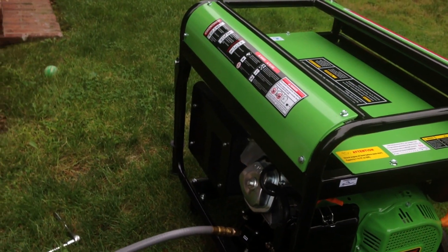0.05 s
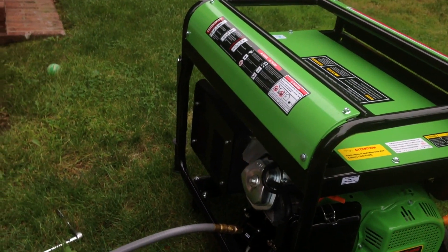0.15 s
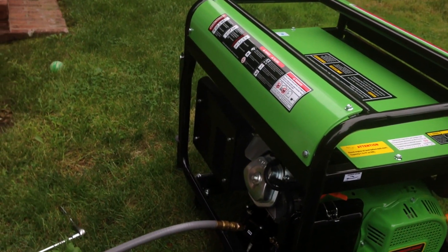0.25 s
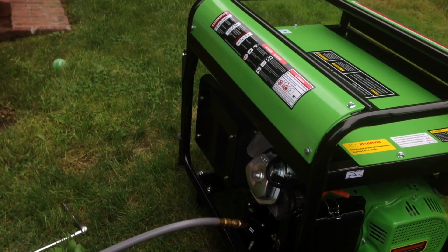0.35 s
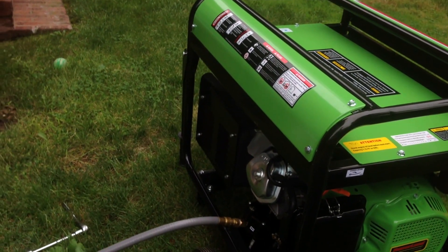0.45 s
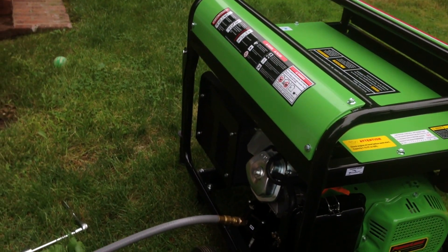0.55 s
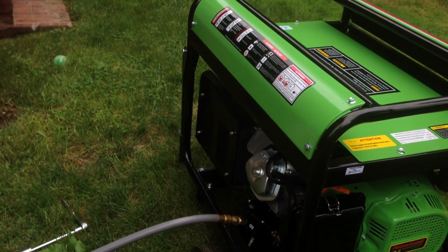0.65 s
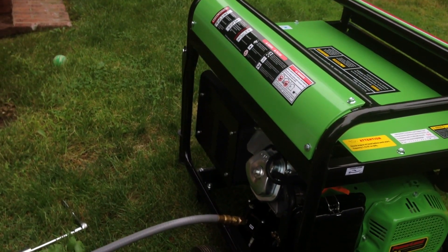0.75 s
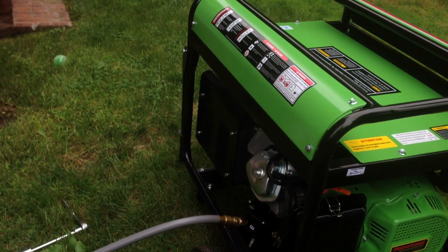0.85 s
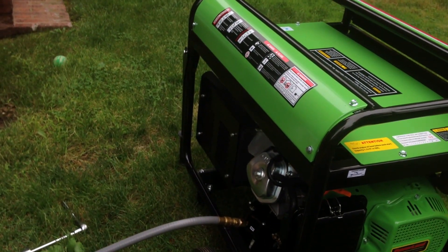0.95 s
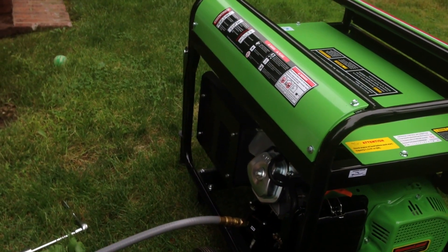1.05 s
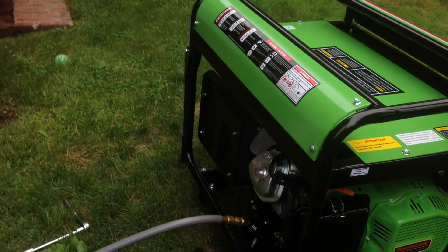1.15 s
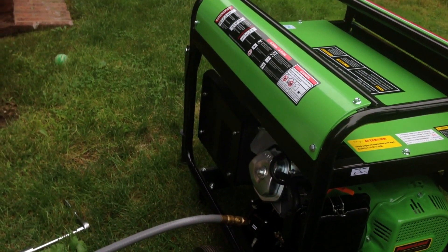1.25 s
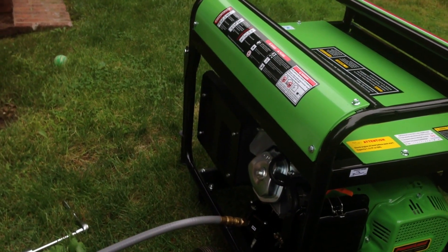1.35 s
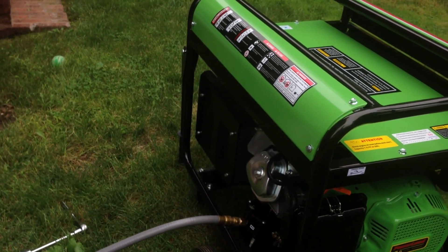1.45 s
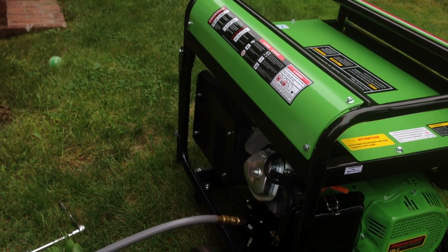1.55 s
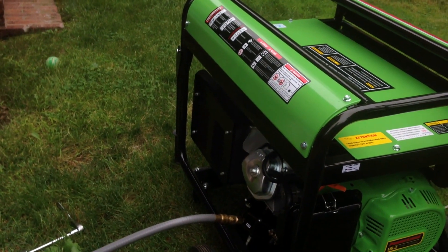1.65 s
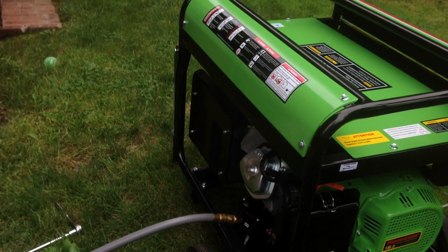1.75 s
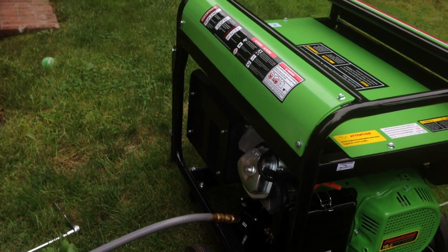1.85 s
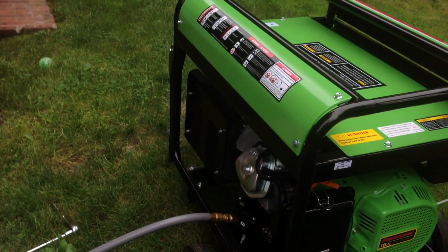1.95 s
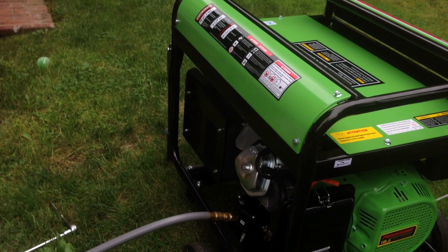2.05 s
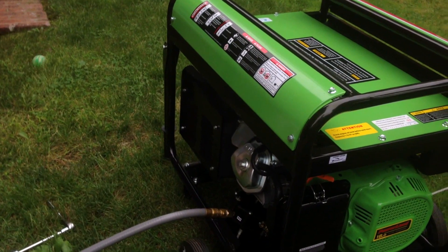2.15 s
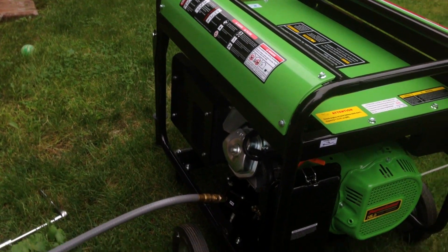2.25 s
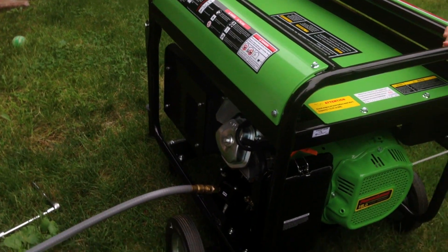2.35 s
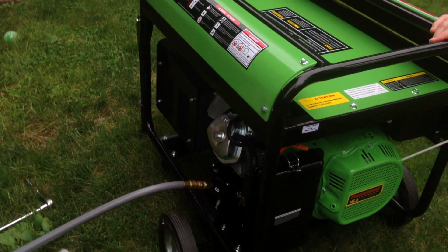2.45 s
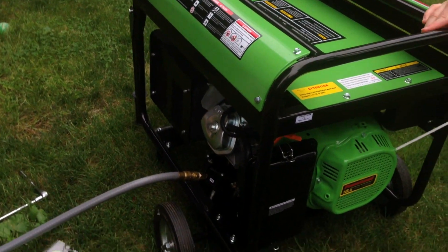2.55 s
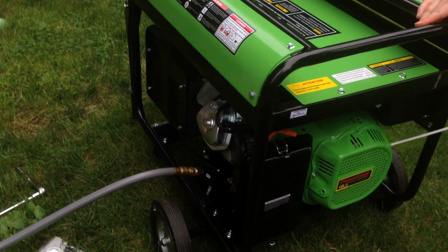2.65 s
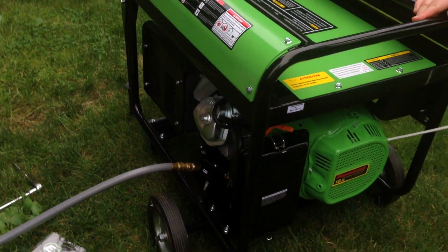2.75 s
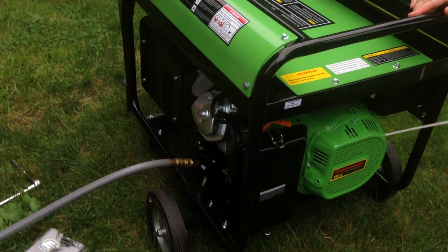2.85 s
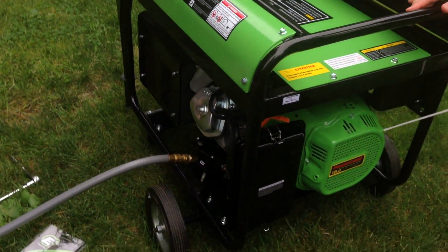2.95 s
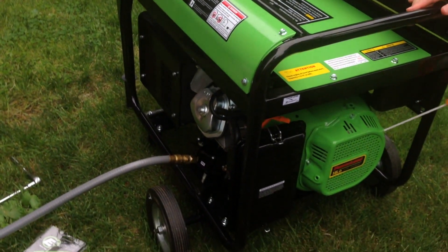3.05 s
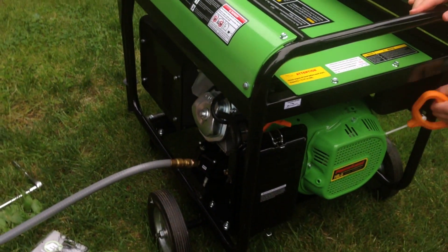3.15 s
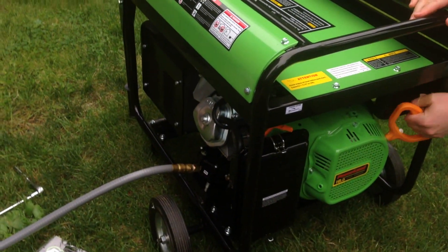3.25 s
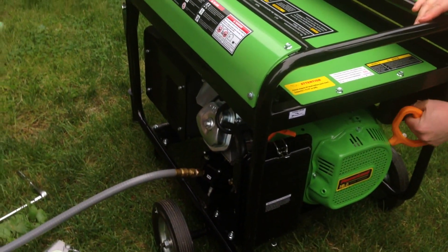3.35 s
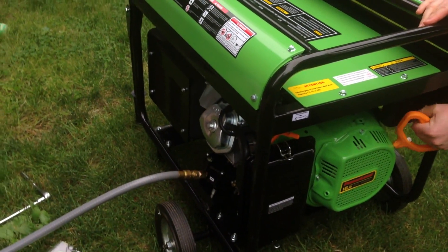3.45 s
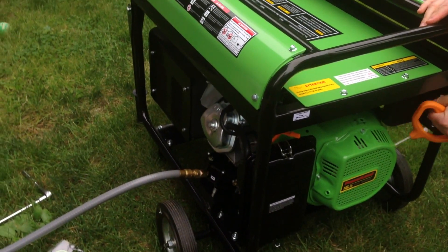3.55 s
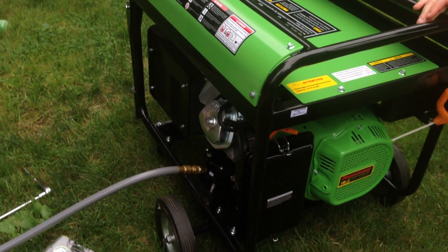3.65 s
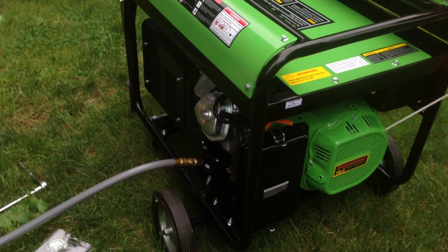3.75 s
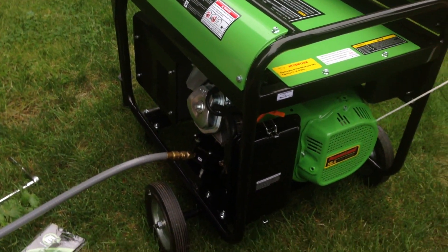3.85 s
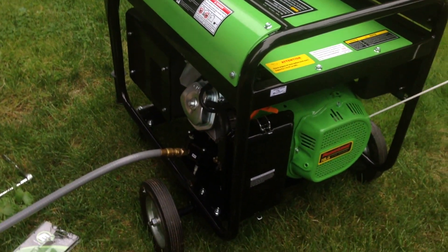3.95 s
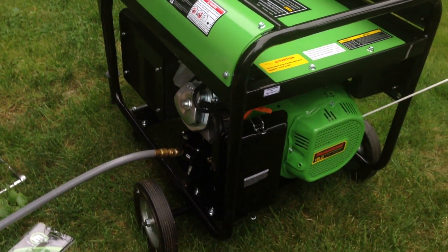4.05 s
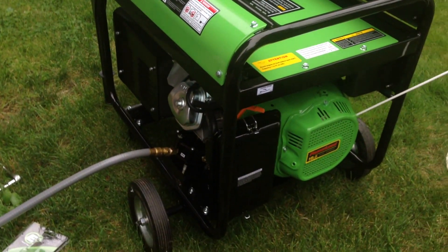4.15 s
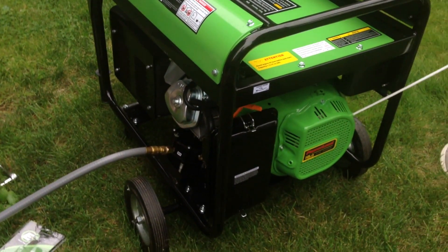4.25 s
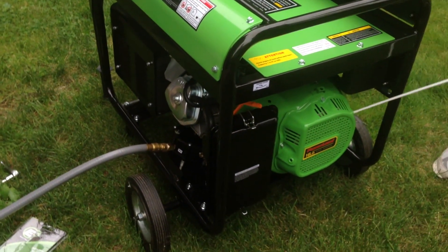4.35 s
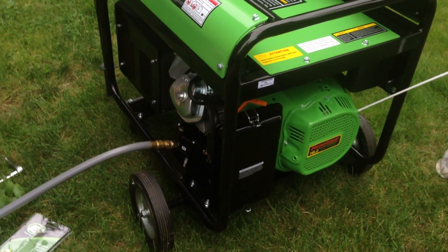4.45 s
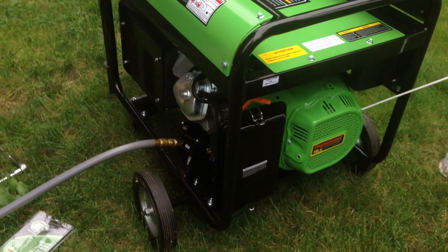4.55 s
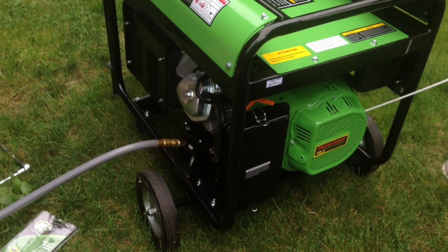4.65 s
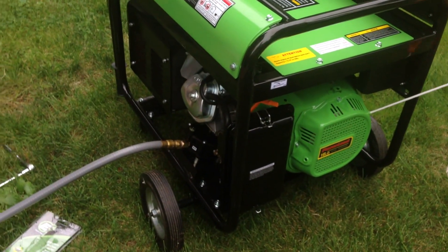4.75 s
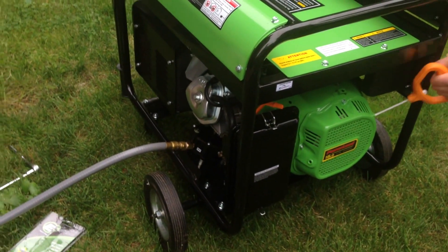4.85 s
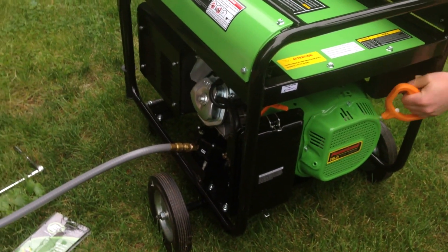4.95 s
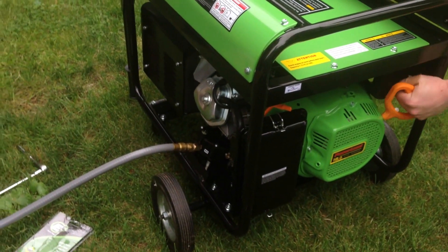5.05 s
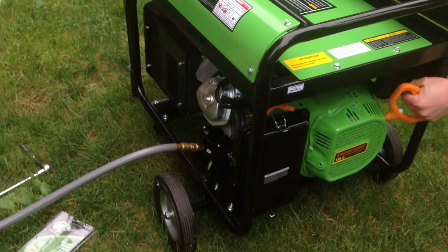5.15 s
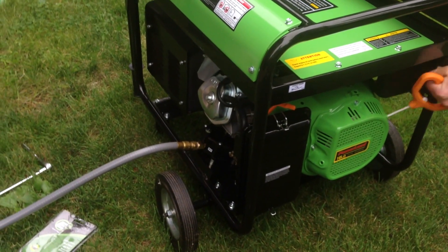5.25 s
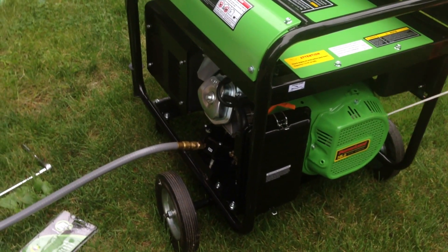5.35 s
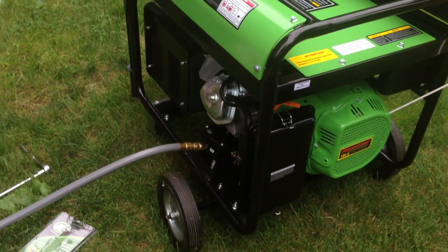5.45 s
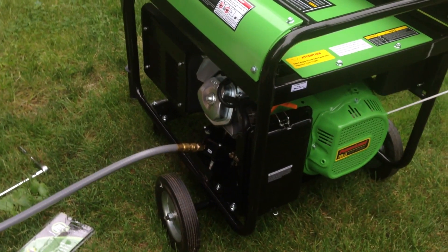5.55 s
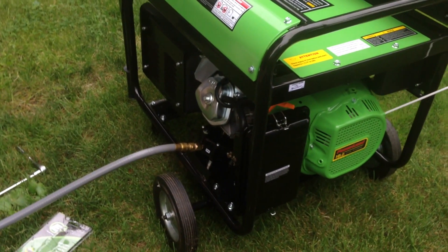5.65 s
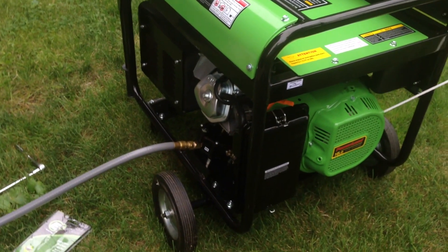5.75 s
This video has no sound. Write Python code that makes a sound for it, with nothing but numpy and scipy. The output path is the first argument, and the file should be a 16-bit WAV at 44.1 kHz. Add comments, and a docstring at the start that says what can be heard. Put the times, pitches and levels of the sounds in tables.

```python
"""On a lawn, close to one microphone, a portable generator is pull-started three times and does not fire.
Two controls snap over, each a noise burst with ringing modes. On each pull the pawls catch and the rope
whirrs out (dense friction impulses, hiss, gliding squeals) while the engine puffs and ticks on a computed
crank motion; the first two pulls end in a steel clank and a rattling rewind, the third is cut off in
mid-stroke. Filtered noise makes the insects trilling over a distant rumble."""
import sys
import numpy as np
from scipy import signal
from scipy.fft import rfft, irfft, next_fast_len
from scipy.io import wavfile

SR = 44100
rng = np.random.default_rng(int(sys.argv[2]) if len(sys.argv) > 2 else 0)


def inscribe(sig):
    """Save sig as 16-bit PCM at rate SR to the path in sys.argv[1].

    A 1-D sig is mono; a 2-D sig holds one channel per row.
    Samples are clipped to [-1, 1] before scaling.
    """
    pcm = np.round(np.clip(np.atleast_2d(sig).T, -1, 1) * 32767)
    wavfile.write(sys.argv[1], SR, pcm.astype(np.int16))


N = 255339
TIME = np.arange(N) / SR

# Levels of events, colours and modes are relative; each source gets its gain in scene().
# Rise is the attack before the extra lag of the bass.

# pulls on the rope: pawls catch t/s, rope runs out t/s (the third past the end of the sound),
# top speed/(turns/s), coasting speed/(turns/s), catch level/dB, whirr taking up slack level/dB,
# whirr at top speed level/dB, swell power/1, whirr as the rewind starts level/dB
PULLS = [(2.2095, 2.724, 11.5, 7.585, -9, -53, -28, 1.6, -29),
         (3.876, 4.385, 12.84, 9.13, -11, -45, -26, 3.0, -26),
         (5.523, 5.93, 13.85, 9.5, -4.5, -36, -21, 2.2, -25)]
# rope squealing in the eyelet: loudest t/s, half length/s, f/Hz, glide/(Hz/s), level/dB
ROPE_SQUEALS = [(2.522, .045, 1400, 4798.5, -30), (4.003, .014, 884, -5500, -37.5),
                (4.206, 0.043, 1460, 6199, -27), (4.987, 0.0078, 862, 3301, -33),
                (5.738, 0.031, 1556, 4600.5, -22.5)]
# valve gear ticking: crank position/turns, level at coasting speed/dB
TICKS = [(0, -14.5), (0.62, -23.5)]
# air puffs in the two turns of a four-stroke cycle: crank position/turns, level at coasting speed/dB
PUFFS = [(0, -30.5), (1, -30.5), (1.48, -26)]
# loudest knocks of the reel in its housing: t/s, level/dB, tilt/(dB/octave)
KNOCKS = [(2.326, -29.5, 1), (2.541, -16, 1), (2.64, -19, 1.5), (2.89, -14, 2.5), (3.0, -25.5, -7),
          (3.07, -19, 0), (3.115, -20.5, 0.5), (3.227, -22, -0.5), (3.287, -17.5, -0.5), (3.363, -25, 1.5),
          (4.204, -17, 1), (4.318, -21, -3), (4.525, -12, -0.5), (4.652, -13, 0.5), (4.748, -15, 0),
          (4.809, -18, 0.5), (4.93, -25.5, 0), (5.631, -18, 2)]
# pawls clinking as they swing out: t/s, level/dB, tilt/(dB/octave), rise/s
CLINKS = [(2.159, -23.5, 2, .0015), (2.187, -20.5, -3, 0.0074), (3.791, -33, 0, .002),
          (3.867, -22.5, 0, 0.0016), (3.962, -25.5, -3.5, .0007), (5.428, -32, 8, 0.0021),
          (5.455, -19, 10, 0.0013)]
# handle landing back on the housing: t/s, level/dB, tilt/(dB/octave), rise/s
LANDINGS = [(3.44, -23.5, -0.5, 0.0044), (5.164, -18.5, 0, 0.00042), (5.204, -32, -8.5, 0.0026),
            (5.237, -29.5, 4, 0.0012)]
# controls snapping over: t/s, level/dB, tilt/(dB/octave), rise/s
SWITCHES = [(0.487, -18.5, 12, 0.0017), (0.728, -17, -1.5, 0.0015)]
# faint brushes of hand and handle on the frame: t/s, level/dB, tilt/(dB/octave), rise/s
BRUSHES = [(.06, -43, -1, 0.012), (.479, -25.5, -2.5, 0.0054), (3.433, -29, -4.5, 0.0023),
           (1.785, -40.5, 2.5, 0.01), (1.92, -40, -1.5, 0.0051), (2.10, -39.5, -3, 0.0048),
           (3.66, -39, -4, .015), (3.745, -37, -1, .01)]

# reel chatter spectrum: f/Hz, density level/dB
WHIRR_COLOUR = [(35, -61), (60, -9), (157, -3), (488, -5.5), (655, 1.5), (1110, 0), (1250, 4), (1360, -8),
                (1610, 3.5), (1720, -5), (2210, 0.5), (2450, -5.5), (2900, -5.5), (6850, -19), (9000, -29),
                (11700, -58), (19800, -120)]
# rope hiss spectrum: f/Hz, density level/dB
HISS_COLOUR = [(1500, -50), (3500, 1), (6000, -1.5), (7500, -10), (9500, -6.5), (12000, -12), (15500, -18)]
# first hard touch of a pawl, spectrum: f/Hz, density level/dB
CRACK_COLOUR = [(800, -15), (2900, 22), (4000, -10), (6000, 7.5), (8000, -19), (15500, -16)]
# pawls catching the flywheel cup, spectrum: f/Hz, density level/dB
CATCH_COLOUR = [(65, -59), (110, -3.5), (542, -3.5), (1010, -3.5), (1460, -1.5), (1660, -3.5), (2080, -11),
                (2900, -13), (3560, -12), (7670, -12.5), (9050, -25), (9830, -20.5), (15500, -26)]
# clank as the rope runs out, spectrum: f/Hz, density level/dB
CLANK_COLOUR = [(88, -55), (150, -3.5), (471, -12.5), (1240, -7.5), (2100, -15), (2760, -2.5), (3620, -5),
                (5330, -7), (7000, -8), (8010, -15), (15500, -13)]
# reel knocks and handle landings, spectrum: f/Hz, density level/dB
KNOCK_COLOUR = [(120, -17), (200, -11.5), (386, -4.5), (541, -6), (707, 6), (1410, -0.5), (1600, 5.5),
                (1810, 4.5), (2880, -2), (3320, -2.5), (14000, -38)]
# valve gear ticks, spectrum: f/Hz, density level/dB
TICK_COLOUR = [(1000, -26), (2200, -22), (3600, 13), (5500, -1.5), (7300, -5.5), (9500, 8), (12000, -18.5),
               (15500, -39)]
# air puffs, spectrum: f/Hz, density level/dB
PUFF_COLOUR = [(60, -30), (110, -27), (160, 10), (230, -22), (350, 3), (700, -35), (2000, -63)]
# pawl clinks, spectrum: f/Hz, density level/dB
CLINK_COLOUR = [(600, -4.5), (1500, 10), (3000, 7), (4500, 6.5), (6300, 6), (8800, -55), (11000, -15.5),
                (15500, -38)]
# controls and brushes, spectrum: f/Hz, density level/dB
SWITCH_COLOUR = [(150, -36), (370, -3.5), (950, -8), (1900, -4.5), (2900, -6.5), (4000, 0), (6000, -0.5),
                 (9500, -10.5), (11000, -31), (15500, -25)]
# distant rumble, spectrum: f/Hz, density level/dB
YARD_COLOUR = [(15, -70), (25, -27.5), (102, -15.5), (146, -1), (233, -4.5), (261, -10), (399, -16.5),
               (436, -16), (713, -18.5), (762, -17), (1390, -20.5), (1700, -19.5), (5200, -27.5),
               (6760, -83), (11400, -120)]
# faint background hiss, spectrum: f/Hz, density level/dB
AIR_COLOUR = [(3000, -20), (5200, 8.5), (9000, 5.5), (15500, 3)]

# decay of a pawl's first touch, time to fall 60 dB: f/Hz, t60/s
CRACK_DECAY = [(1000, 0.14), (10000, 0.011)]
# decay of a catch: f/Hz, t60/s
CATCH_DECAY = [(150, 0.19), (900, 0.14), (2800, 0.1), (8000, 0.071)]
# decay of a clank: f/Hz, t60/s
CLANK_DECAY = [(200, 0.35), (1200, 0.44), (3000, 0.1), (8000, 0.14), (14000, 0.079)]
# decay of a knock or landing: f/Hz, t60/s
KNOCK_DECAY = [(300, 0.31), (1200, 0.15), (6000, 0.1)]
# decay of a tick or clink: f/Hz, t60/s
TICK_DECAY = [(2000, 0.098), (10000, 0.064)]
# decay of a puff: f/Hz, t60/s
PUFF_DECAY = [(150, 0.094), (600, 0.18)]
# decay of a control or brush: f/Hz, t60/s
SWITCH_DECAY = [(300, 0.092), (900, 0.26), (2500, 0.25), (5000, 0.11), (12000, 0.087)]

# ringing modes of the flywheel: f/Hz, level/dB, t60/s
FLYWHEEL = [(268, -21.5, 0.15), (333, -14.5, 0.13), (496.4, -20.5, 0.17), (713, -14, 0.12),
            (843, -23, 0.25), (968, -14, 0.11), (1138, -21, 0.11), (1256, -19, 0.16), (1740, -17, 0.099),
            (2910, -2, 0.02), (3050, -9.5, 0.025)]
# ringing modes of the loose steel: f/Hz, level/dB, t60/s
STEEL = [(2637, -18, .14), (2682, -19, .18), (2830, -19, .12), (2964, -27, .65), (5325, -16, .22),
         (5360, -19, .5), (5408, -18, .5), (5445, -17, .2), (6340, -21, .12), (6390, -19, .16),
         (7780, -15, .1), (7835, -15, .13), (8048, -18, .11), (9955, -20, .15), (10068, -18, .15),
         (11450, -28, .1), (13280, -27, .08), (15160, -26, .08)]
# ringing modes of the reel: f/Hz, level/dB, t60/s
REEL = [(671.5, -24, 0.46), (757.6, -19, 0.28), (963, -31, 0.17), (1035, -16, 0.11), (1198, -13, 0.13),
        (1326, -22.5, 0.15), (1690, -41, 0.087)]
# ringing modes of the valve gear: f/Hz, level/dB, t60/s
VALVE_GEAR = [(3470, -19.5, 0.043), (3936, -14, 0.039), (5400, -19, .03), (8620, -16.5, 0.024),
              (9250, -23, 0.06), (9500, -20, 0.03)]
# ringing modes of the muffler: f/Hz, level/dB, t60/s
MUFFLER = [(159, 3.5, 0.077), (195, -1, 0.13)]
# ringing modes of the pawls: f/Hz, level/dB, t60/s
PAWL = [(5450, -16, .06), (5620, -15, .04), (6370, -12, .05), (7820, -21, .06), (8150, -21, .07),
        (11450, -32, .06)]
# ringing modes of the housing: f/Hz, level/dB, t60/s
HOUSING = [(395, -15, 0.26), (624, -17, 0.086), (1191, -5.5, 0.085), (1305, -35, 0.089), (1518, -16, 0.2),
           (1640, -10, 0.11), (2935, -18, 0.099)]
# ringing modes of the control lever: f/Hz, level/dB, t60/s
LEVER = [(379, -19.5, 0.22), (800, -36, 0.99), (1600, -32, 0.42), (1660, -35, 0.57), (3010, -17.5, 0.15),
         (2840, -25, 0.15), (2980, -23, 0.16)]
# ringing modes of the sheet-metal control panel: f/Hz, level/dB, t60/s
PANEL = [(804, -36, .8), (1016, -40, 0.5), (1034, -29, 0.4), (1230, -23, .16), (1830, -27, .22),
         (2500, -28, 0.29), (2610, -20, 0.26), (2654, -19, 0.24), (3430, -26, 0.25), (3600, -14, 0.099),
         (4100, -22, 0.18)]
# resonances of housing, tank and frame: f/Hz, width/Hz, level over the direct sound/dB
BODY = [(343.6, 8.3, -4.5), (667, 11, 0.5), (828, 15, -6.5), (953, 6.9, 7), (1014, 16, 5), (1288, 23, 5.5),
        (1622, 13.4, 2.5), (1855, 14, -1), (2264, 10, 7), (2740, 30, 1), (2928, 36, 3), (3330, 26, -33),
        (4430, 26, -6), (9880, 96, 0), (9620, 80, -3)]
# insect chorus: f/Hz, width of each of two filter passes/Hz, rms level/dB
INSECTS = [(6153, 280, -58.5), (6430, 99, -63.5), (7280, 900, -67.5)]

# friction slows the coasting crank
DRAG_TURNS_PER_S2 = 8.0
# the engine's sounds fade outside this stretch of crank positions
LOUD_FROM_TURNS, LOUD_UNTIL_TURNS, FADE_DB_PER_TURN = -2.34, 3.4, 20.5
# the whirr falls on either side of taking up the slack, and as the rope winds back in
TAKE_UP_DB_PER_S, REWIND_DB_PER_S = 150, 35.5
# rope hiss envelope relative to the whirr envelope, under tension and slack
TAUT_HISS_DB, SLACK_HISS_DB = -14, -17.5
# lesser knocks: mean level over the whirr envelope, and spread
RATTLE_DB, RATTLE_SPREAD_DB = 7.5, 2.5
KNOCK_RISE_S = 0.0012


def starter(whirr_db, hiss_db, chatter_db, chatter_rate_hz):
    """The reel chatters on its post while the rope rubs through the eyelet."""
    whirr_level, hiss_level = reel_levels()
    chatter = rms_one(from_db(chatter_db * drift(chatter_rate_hz)))
    contacts = friction(per_s=1300, spread_db=1.5) * chatter
    reel = from_db(whirr_db) * whirr_level * coloured(contacts, WHIRR_COLOUR)
    rubbing = rng.standard_normal(N) * np.sqrt(chatter)
    rope = from_db(hiss_db) * hiss_level * coloured(rubbing, HISS_COLOUR)
    return reel + rope


def reel_levels():
    """Gains of whirr and rope hiss: slack is taken up, the stroke swells, any rewind dies away."""
    whirr, hiss = np.zeros(N), np.zeros(N)
    for catch_s, end_s, _, _, _, take_up_db, top_db, swell_power, rewind_db in PULLS:
        progress = np.clip((TIME - catch_s) / (end_s - catch_s), 0, 1)
        take_up = from_db(take_up_db - TAKE_UP_DB_PER_S * abs(TIME - catch_s))
        stroke = from_db(top_db) * np.sin(np.pi / 2 * progress) ** swell_power * (TIME < end_s)
        rewind = from_db(rewind_db - REWIND_DB_PER_S * abs(TIME - end_s)) * (TIME >= end_s)
        whirr += take_up + stroke + rewind
        hiss += from_db(TAUT_HISS_DB) * (take_up + stroke) + from_db(SLACK_HISS_DB) * rewind
    return whirr, hiss


def friction(per_s, spread_db):
    """Many tiny contacts of uneven strength and random sign."""
    contact = rng.random(N) < per_s / SR
    sign = rng.choice([-1, 1], N)
    strength = from_db(spread_db * np.clip(rng.standard_normal(N), -2, 2))
    return contact * sign * strength


def rope_song(gain_db):
    """Braid running over the eyelet gives a rough, broken tone that glides in pitch."""
    out = np.zeros(N)
    for s, half_s, hz, glide_hz_per_s, db in ROPE_SQUEALS:
        pitch_hz = (hz + glide_hz_per_s * (TIME - s)) * (1 + .09 * drift(260))
        grip = rms_one(from_db(4.5 * drift(110)))
        level = from_db(db + gain_db) * np.exp(-((TIME - s) / half_s) ** 2)
        out += level * grip * np.sin(2 * np.pi * np.cumsum(pitch_hz) / SR)
    return out


def crank(contacts, cycle_turns, db_per_doubling):
    """(s, dB) of engine contacts: steady speed-up under the rope, speed lost as it runs out, coasting."""
    rows = []
    for catch_s, end_s, top, coast, *_ in PULLS:
        for position, db in contacts:
            # turns count from where the rope runs out; speed squared changes evenly with the angle
            for turn in position + cycle_turns * np.arange(-6, 7):
                if turn < 0:
                    start, acceleration = top, top / (end_s - catch_s)
                else:
                    start, acceleration = coast, -DRAG_TURNS_PER_S2
                speed_squared = start ** 2 + 2 * acceleration * turn
                if speed_squared > 0:
                    speed = np.sqrt(speed_squared)
                    s = end_s + (speed - start) / acceleration
                    outside_turns = max(0, LOUD_FROM_TURNS - turn, turn - LOUD_UNTIL_TURNS)
                    speed_db = db_per_doubling * np.log2(speed / coast)
                    rows.append((s, db + speed_db - FADE_DB_PER_TURN * outside_turns))
    return rows


def rattle(count, lasts_s):
    """(s, dB) of the loose reel's uneven knocks after each catch, following the whirr envelope."""
    whirr, _ = reel_levels()
    offsets = [lasts_s * (np.arange(count) + rng.random(count)) / count for _ in PULLS]
    s = np.concatenate([pull[0] + offset for pull, offset in zip(PULLS, offsets)])
    whirr_db = 20 * np.log10(np.interp(s, TIME, whirr) + 1e-9)
    db = whirr_db + RATTLE_DB + RATTLE_SPREAD_DB * rng.standard_normal(len(s))
    return list(zip(s, db))


def alike(rows, tilt_db, rise_s):
    """Give (s, dB) blows of one kind the same tilt and attack; drop those past the end."""
    return [(s, db, tilt_db, rise_s) for s, db in rows if 0 < s < TIME[-1]]


def blows(rows, colour, decay, gain_db, bass_lag_s):
    """Each blow wakes a dense cloud of modes that die band by band; the low ones build up later."""
    t = np.arange(SR // 3) / SR
    edges = np.geomspace(60, 16500, 21)
    centres = np.sqrt(edges[1:] * edges[:-1])
    bank = [signal.butter(2, pair, "band", fs=SR, output="sos") for pair in zip(edges, edges[1:])]
    clouds = np.array([signal.sosfilt(sos, rng.standard_normal(N + len(t))) for sos in bank])
    fade = from_db(at_hz(colour, centres))[:, None] * 1e-3 ** (t / at_hz(decay, centres)[:, None])
    lag = bass_lag_s * 1000 / (centres + 500)  # equals bass_lag_s at 500 Hz
    out = np.zeros(N)
    for s, level_db, tilt_db, rise_s in rows:
        swell = 1 - np.exp(-(t / (rise_s + lag[:, None] + 1 / SR)) ** 2)
        bands = clouds[:, int(s * SR):][:, :len(t)] * fade * swell
        blow = from_db(tilt_db * np.log2(centres)) @ bands
        # the level is that of the first 20 ms
        add(out, s, from_db(level_db + gain_db) * blow / np.std(blow[:SR // 50]))
    return out


def ring(rows, modes, gain_db, uneven_db, rise_s):
    """Every blow sets a part's modes ringing, each with a strength of its own; close pairs beat."""
    t, out = np.arange(SR // 2) / SR, np.zeros(N)
    hz, db, t60 = np.transpose(modes)[:, :, None]
    fade = np.exp(-np.log(1000) * t / t60) * (1 - np.exp(-(t / rise_s) ** 2))
    for s, level_db, _, _ in rows:
        strength = from_db(db + uneven_db * 2 * (rng.random(hz.shape) - .5))
        tones = strength * fade * np.sin(2 * np.pi * (hz * t + rng.random(hz.shape)))
        add(out, s, from_db(level_db + gain_db) * tones.sum(axis=0))
    return out


def body(x, low_hz):
    """Housing, tank and frame ring along with contacts, air and rope, and radiate little bass."""
    x = signal.sosfilt(signal.butter(5, low_hz, "high", fs=SR, output="sos"), x)
    return x + sum(from_db(db) * resonate(x, hz, width_hz) for hz, width_hz, db in BODY)


def yard_echo(x, wet_db, t60, cut_hz):
    """A faint, dull scatter from the surroundings: decaying noise that begins after 15 ms."""
    t = np.arange(SR) / SR
    tail = rng.standard_normal(SR) * np.exp(-np.log(1000) * t / t60) * (t > .015)
    lowpass = signal.butter(2, cut_hz, fs=SR, output="sos")
    tail = signal.sosfilt(lowpass, tail / np.linalg.norm(tail))
    return from_db(wet_db) * signal.fftconvolve(x, tail)[:N]


def yard(rumble_db, air_db):
    """Distant rumble, faint hiss and a steady insect chorus, all of filtered noise."""
    rumble = from_db(rumble_db) * coloured(rng.standard_normal(N), YARD_COLOUR)
    air = from_db(air_db) * coloured(rng.standard_normal(N), AIR_COLOUR)
    insects = np.zeros(N)
    for hz, width_hz, db in INSECTS:
        trill = resonate(resonate(rng.standard_normal(N), hz, width_hz), hz, width_hz)
        insects += from_db(db) * rms_one(trill)
    return rumble + air + insects


def from_db(db):
    """Decibels to gain."""
    return 10 ** (np.asarray(db) / 20)


def rms_one(x):
    """Scale to unit power."""
    return x / np.sqrt(np.mean(x ** 2) + 1e-20)


def at_hz(points, hz):
    """Read a table on a log-frequency axis."""
    known_hz, values = np.transpose(points)
    return np.interp(np.log(np.maximum(hz, 1)), np.log(known_hz), values)


def coloured(x, colour):
    """Give a steady signal a spectrum; rms 1."""
    size = next_fast_len(N)
    gain = from_db(at_hz(colour, np.fft.rfftfreq(size, 1 / SR)))
    return rms_one(irfft(rfft(x, size) * gain, size)[:N])


def drift(rate_hz):
    """Smooth random wandering with rms 1: noise through a double-pole lowpass."""
    r = np.exp(-2 * np.pi * rate_hz / SR)
    noise = rng.standard_normal(N + SR)
    return rms_one(signal.lfilter([1], [1, -2 * r, r * r], noise)[SR:])  # drop the settling second


def resonate(x, hz, width_hz):
    """A two-pole resonance with gain about 1 on top."""
    r = np.exp(-np.pi * width_hz / SR)
    feed = np.array([1, 0, -1]) * (1 - r * r) / 2
    return signal.lfilter(feed, [1, -2 * r * np.cos(2 * np.pi * hz / SR), r * r], x + 1e-18)


def add(out, s, sound):
    """Mix a sound in at time s."""
    start = int(s * SR)
    out[start:start + len(sound)] += sound[:N - start]


def scene():
    """The machine close by, its faint echo and the yard behind it."""
    turning = starter(whirr_db=-2.5, hiss_db=5.0, chatter_db=1.5, chatter_rate_hz=28) + rope_song(gain_db=1.5)
    # each pull starts with the pawls catching the flywheel cup;
    # the first two end in a steel clank, the third is cut off before its own
    catches = alike([(pull[0], pull[4]) for pull in PULLS], tilt_db=1.77, rise_s=0.00038)
    clanks = alike([(pull[1], 0) for pull in PULLS], tilt_db=1.5, rise_s=0.0016)
    knocks = [(*knock, KNOCK_RISE_S) for knock in KNOCKS]
    knocks += alike(rattle(count=20, lasts_s=1.0), tilt_db=0.0, rise_s=KNOCK_RISE_S)
    ticks = alike(crank(TICKS, cycle_turns=0.99, db_per_doubling=3), tilt_db=5.0, rise_s=0.0021)
    puffs = alike(crank(PUFFS, cycle_turns=2, db_per_doubling=5.5), tilt_db=6, rise_s=.0065)
    contacts = (blows(catches, CRACK_COLOUR, CRACK_DECAY, gain_db=-19, bass_lag_s=0)
                + blows(catches, CATCH_COLOUR, CATCH_DECAY, gain_db=-15.5, bass_lag_s=0.0045)
                + blows(clanks, CLANK_COLOUR, CLANK_DECAY, gain_db=-13.5, bass_lag_s=0.00061)
                + blows(knocks, KNOCK_COLOUR, KNOCK_DECAY, gain_db=-15.0, bass_lag_s=0.0011)
                + blows(ticks, TICK_COLOUR, TICK_DECAY, gain_db=-19, bass_lag_s=0.00084)
                + blows(CLINKS, CLINK_COLOUR, TICK_DECAY, gain_db=-16, bass_lag_s=0.0035)
                + blows(LANDINGS, KNOCK_COLOUR, KNOCK_DECAY, gain_db=-13.0, bass_lag_s=0.00081)
                + blows(SWITCHES, SWITCH_COLOUR, SWITCH_DECAY, gain_db=-14.5, bass_lag_s=0.00063)
                + blows(BRUSHES, SWITCH_COLOUR, SWITCH_DECAY, gain_db=-14.0, bass_lag_s=0.00081))
    puffing = blows(puffs, PUFF_COLOUR, PUFF_DECAY, gain_db=-19.5, bass_lag_s=0.00061)
    # the steel sits loosely, so its ring flutters
    flutter = rms_one(1 + .55 * drift(90))
    # the first control is a lever, the second sits on a sheet-metal panel
    rings = (ring(catches, FLYWHEEL, gain_db=0.5, uneven_db=3.5, rise_s=0.0068)
             + ring(clanks, STEEL, gain_db=-1.5, uneven_db=.5, rise_s=.008) * flutter
             + ring(knocks, REEL, gain_db=-0.5, uneven_db=4, rise_s=0.0048)
             + ring(ticks, VALVE_GEAR, gain_db=-2, uneven_db=5, rise_s=0.0013)
             + ring(puffs, MUFFLER, gain_db=0.5, uneven_db=1.5, rise_s=0.0096)
             + ring(CLINKS, PAWL, gain_db=0, uneven_db=2, rise_s=0.0016)
             + ring(LANDINGS, HOUSING, gain_db=1, uneven_db=2, rise_s=0.0031)
             + ring(SWITCHES[:1], LEVER, gain_db=0, uneven_db=1.0, rise_s=0.0043)
             + ring(SWITCHES[1:], PANEL, gain_db=-0.5, uneven_db=2, rise_s=0.0031))
    machine = body(contacts + puffing + turning, low_hz=133) + rings
    echo = yard_echo(machine, wet_db=-30.5, t60=0.1, cut_hz=3300)
    return machine + echo + yard(rumble_db=-56.0, air_db=-65.0)


def record(dry):
    """One microphone channel with a steep cut of the top treble."""
    top_cut = signal.ellip(10, .1, 80, 15450, fs=SR, output="sos")
    return signal.sosfilt(top_cut, dry)[None]


dry = scene()
out = record(dry)
inscribe(out)
```